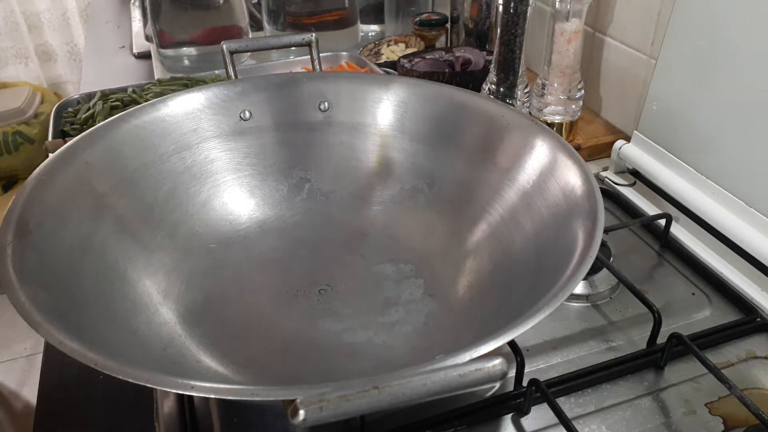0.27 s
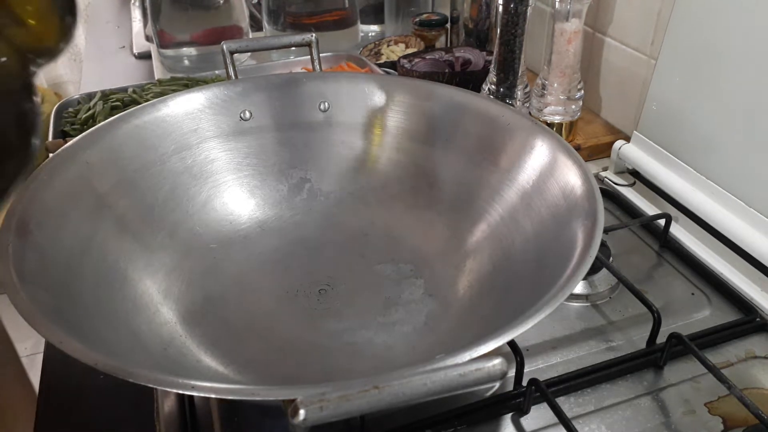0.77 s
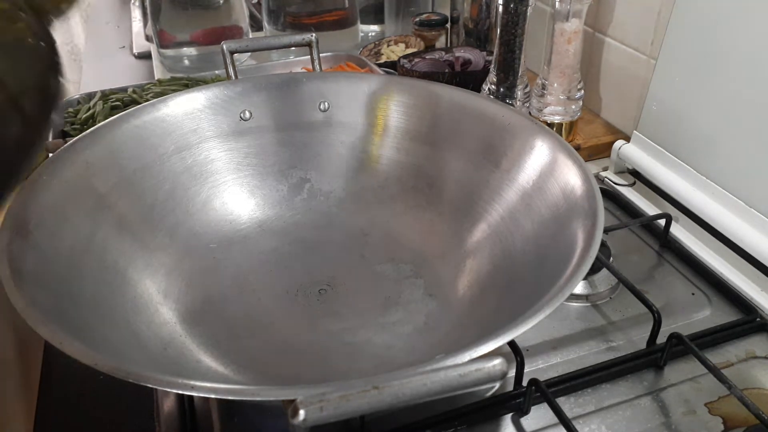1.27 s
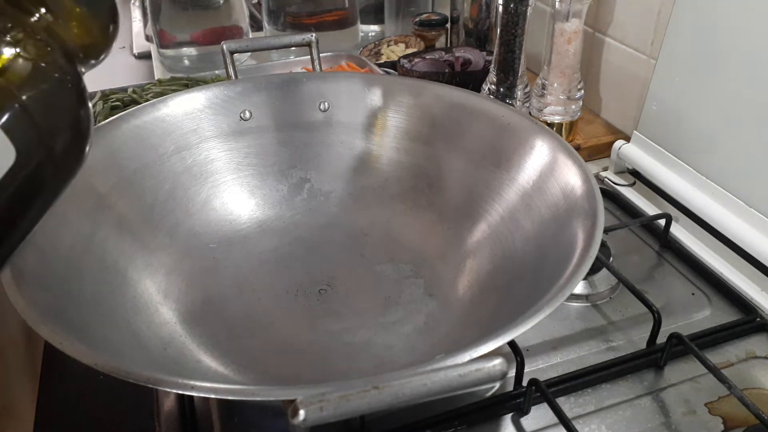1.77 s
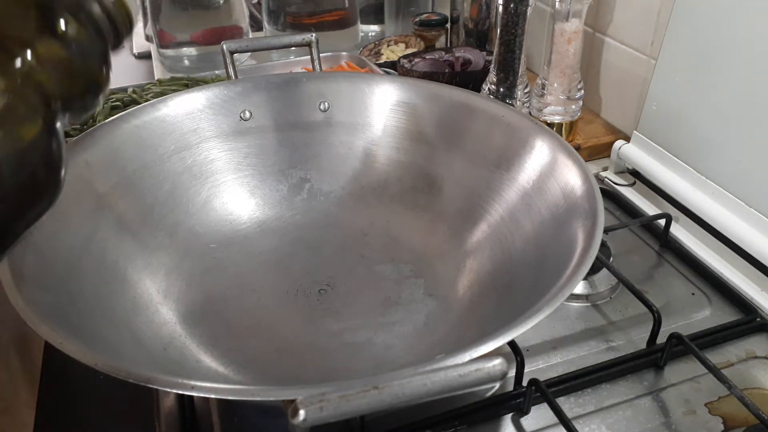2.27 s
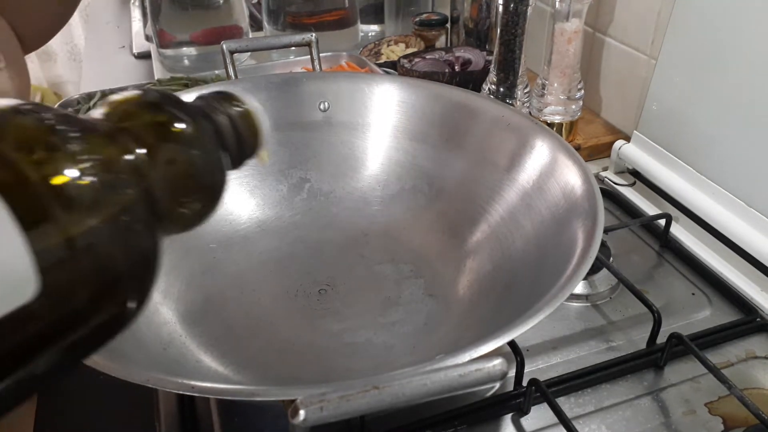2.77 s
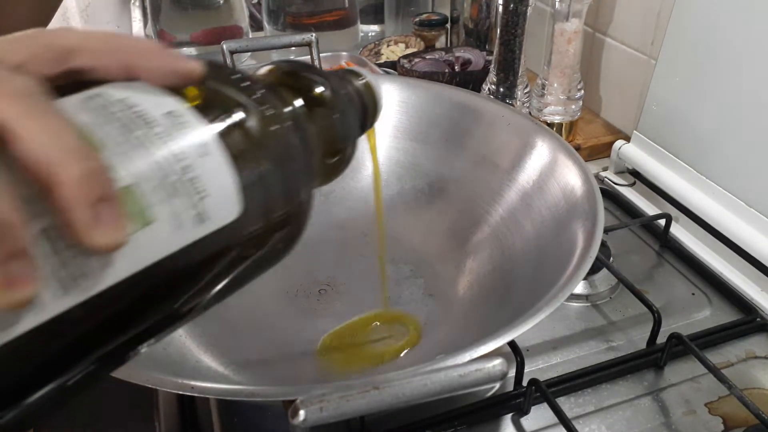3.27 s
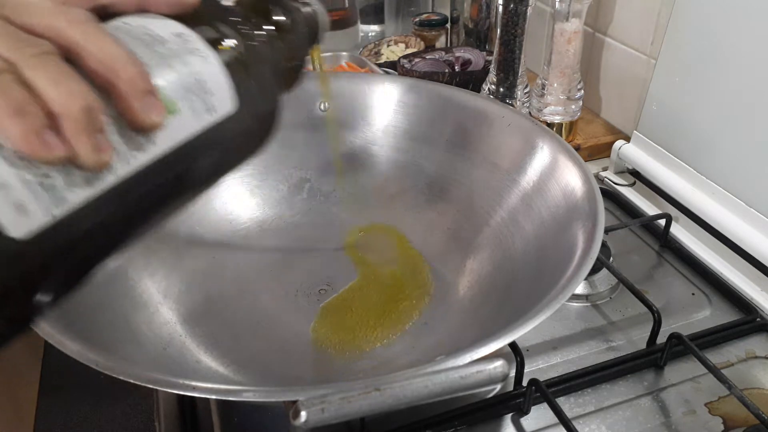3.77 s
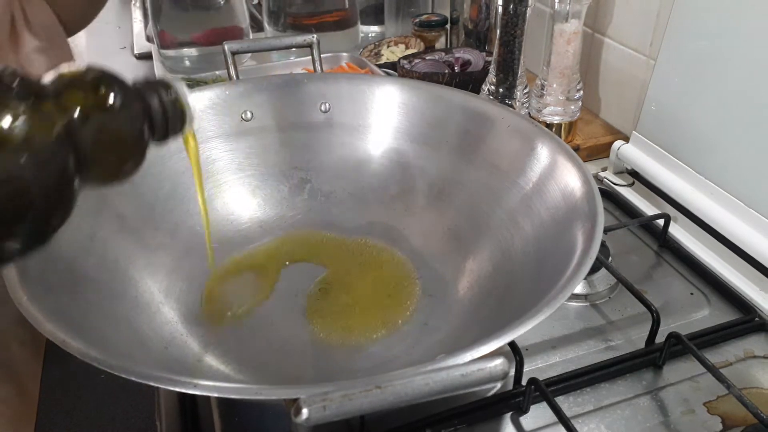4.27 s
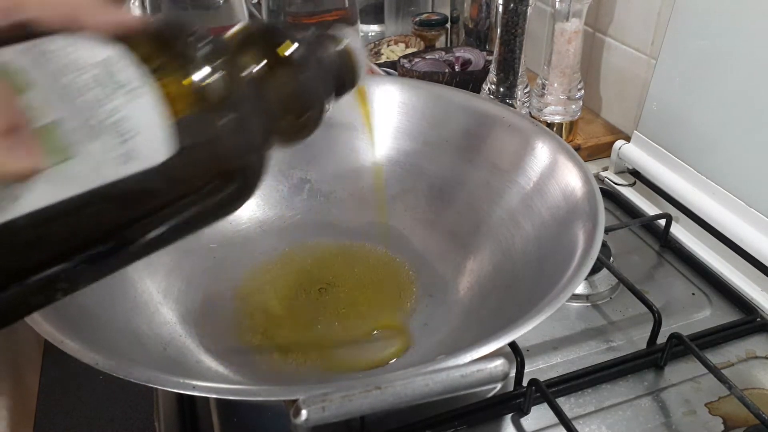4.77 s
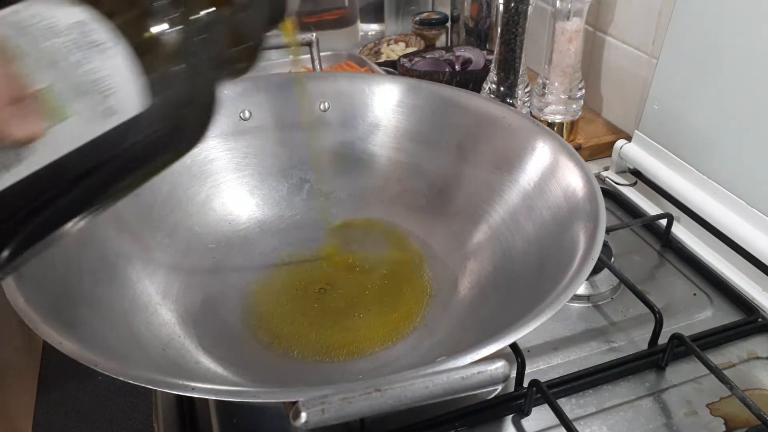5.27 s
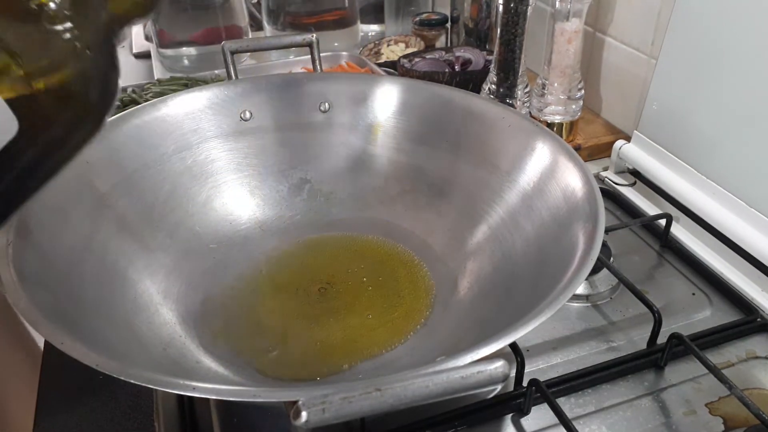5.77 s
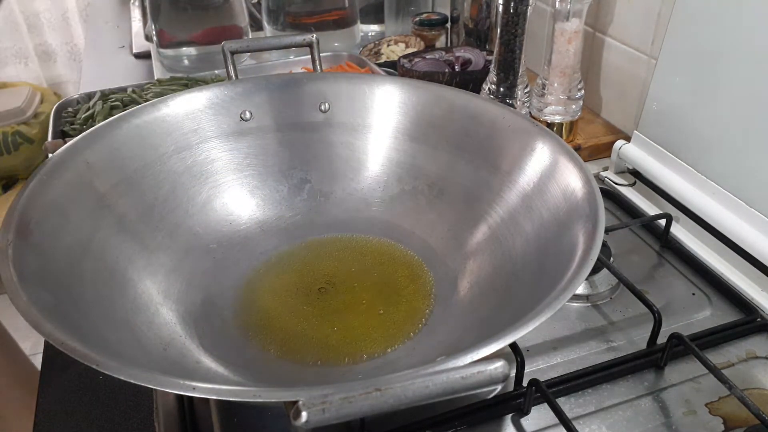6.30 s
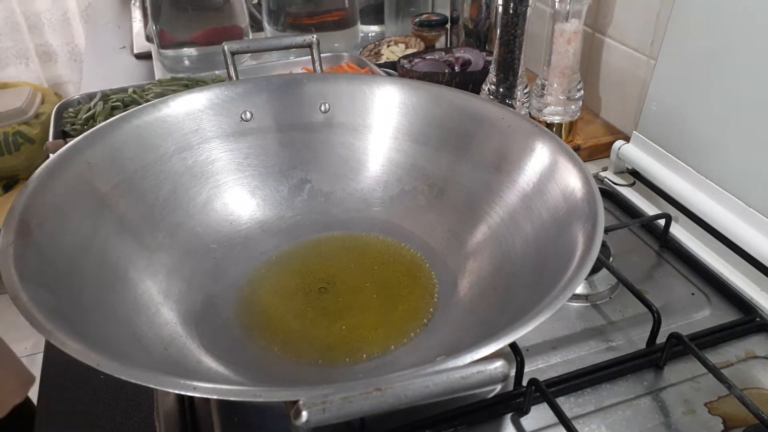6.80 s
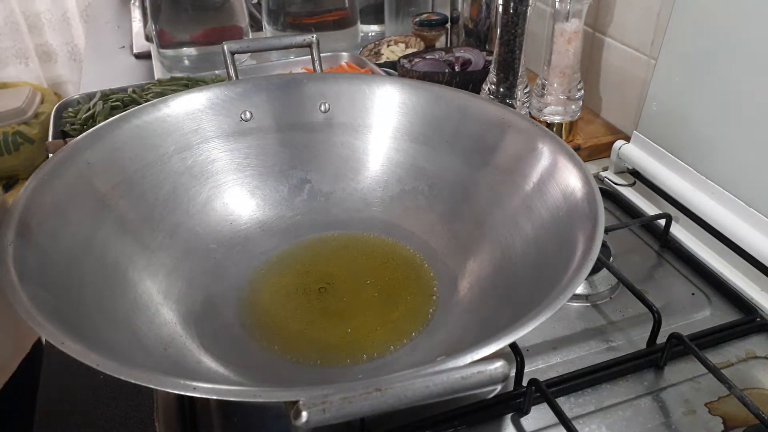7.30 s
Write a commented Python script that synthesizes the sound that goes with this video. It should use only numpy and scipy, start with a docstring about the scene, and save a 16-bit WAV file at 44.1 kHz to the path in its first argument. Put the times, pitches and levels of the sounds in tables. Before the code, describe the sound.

Over faint kitchen hiss, sharp cap snaps, small plastic ticks and low soft gulps of pouring oil, then cap taps and rough thread scrapes.

```python
"""Soft catches and scrapes of a turning cap come first, over a steady hiss with fixed resonances and a low rumble.
Then the cap of a plastic oil bottle snaps loose; the squeezed bottle ticks and air gulps softly in it
as it pours into a metal wok; at last the cap taps, scrapes and catches its way back on.
Clicks and scrapes are random slips filtered by plastic, gulps are gliding tones, and the background is
shaped noise; the bowl and the tiled kitchen echo the clicks, scrapes and crackle."""
import sys
import numpy as np
from scipy import signal
from scipy.io import wavfile
from scipy.ndimage import uniform_filter1d

SR = 44100
rng = np.random.default_rng(int(sys.argv[2]) if len(sys.argv) > 2 else 0)


def waveform_to_disk(signal):
    """Save audio, clipped to [-1, 1], as 16-bit WAV at the path in sys.argv[1]."""
    frames = np.transpose(np.atleast_2d(signal))
    scaled = np.clip(frames, -1, 1) * 32767
    samples = np.round(scaled).astype(np.int16)
    wavfile.write(sys.argv[1], SR, samples)


N = 332646  # length in samples


def gain_of(db):
    """Decibel law: amplitude factor of a level."""
    return 10 ** (np.asarray(db) / 20)


def evened(x):
    """Normalization: scale to unit effective (RMS) value."""
    return x / np.sqrt(np.mean(x ** 2) + 1e-20)


def read(points, hz):
    """Interpolation of a curve along the logarithm of frequency."""
    f, value = np.transpose(points)
    return np.interp(np.log(hz + 1), np.log(f + 1), value)


def gain_over_time(points):
    """Envelope principle: levels joined by straight lines in dB, as a gain for each sample."""
    s, db = np.transpose(points)
    return gain_of(np.interp(np.arange(N) / SR, s, db))


def add(mix, s, sound):
    """Superposition: add a sound to the mix from s seconds on."""
    part = mix[max(round(s * SR), 0):][:len(sound)]
    part += sound[:len(part)]


def coloured(x, gain):
    """Minimum-phase principle: a causal filter follows from its magnitude gain(hz) alone."""
    size = 2048
    log_gain = np.log(np.maximum(gain(abs(np.fft.fftfreq(size, 1 / SR))), 1e-5))
    spectrum = np.exp(np.conj(signal.hilbert(log_gain)))
    impulse_response = np.fft.ifft(spectrum).real[:size // 2]
    return signal.oaconvolve(x, impulse_response)


def modes(table, hz):
    """Resonance: summed power of peaks, each with its full width taken 6 dB down."""
    power = sum(gain_of(2 * db) / (1 + (2 * (hz - f) / width) ** 2) ** 2 for f, width, db in table)
    return np.sqrt(power)


def noise(gain, size, patchy_db):
    """Random-phase noise: Gaussian short-time spectra whose level drifts in patches of time and frequency."""
    frames, hz = N * 4 // size + 5, np.fft.rfftfreq(size, 1 / SR)
    real, imaginary, patches = rng.standard_normal((frames, len(hz), 3)).T
    patches = uniform_filter1d(patches, size=8, axis=0)
    patches = evened(uniform_filter1d(patches, size=12, axis=1))
    spectra = (real + 1j * imaginary) * gain(hz)[:, None] * gain_of(patchy_db * patches)
    return evened(signal.istft(spectra, nperseg=size, noverlap=size * 3 // 4)[1][:N])


# Broad colour of the hiss. Each row: frequency in Hz, relative density in dB per Hz.
HISS_COLOUR = [(120, -48), (200, -21), (659, -19), (763, -17.5), (1120, -10), (1400, -9.5), (1650, -20),
               (1870, -8), (2090, -17), (2250, -5), (2750, -18), (3070, -20), (4040, -13), (5200, -16),
               (6450, -15.5), (6950, -14.5), (7680, -16.5), (9230, -10.5), (16000, -15.5)]
# Resonances in the hiss. Each row: frequency in Hz, width in Hz, relative level in dB.
HISS_RESONANCES = [(1020, 40, -9), (1395, 85, -.6), (1850, 38, -6), (2235, 35, -5), (2575, 30, -8),
                   (2885, 30, -16), (3280, 30, -14), (3715, 38, -10), (4075, 70, -10), (4460, 90, -15),
                   (5950, 45, -14), (6315, 45, -11), (8620, 240, -15), (9150, 110, -7), (9560, 50, -12),
                   (9890, 80, -15), (10650, 90, -13), (11950, 90, -16)]
HISS_DB = -55  # effective level


def hiss():
    """Resonance in broadband noise: fixed narrow peaks stand out of a steady hiss."""
    def gain(hz):
        broad = gain_of(read(HISS_COLOUR, hz) - 7.5)
        return np.hypot(broad, modes(HISS_RESONANCES, hz)) * (hz > 200)
    return gain_of(HISS_DB) * noise(gain, size=2048, patchy_db=1.9)


# Colour of the rumble. Each row: frequency in Hz, relative density in dB per Hz.
RUMBLE_COLOUR = [(13, -66), (22, -29), (38, -12), (55, -36), (102, 5.5), (144, -5), (167, -5.5),
                 (275, -18.5), (325, -11.5), (400, -14.5), (520, -49), (880, -120)]
# Course of the rumble. Each row: time in seconds, level in dB.
RUMBLE_LEVEL = [(0, -69.5), (1.6, -71), (2.1, -64.5), (2.5, -68.5), (3.2, -67), (4.0, -68.5), (4.6, -65.5),
                (6.4, -68.5), (7.54, -68)]


def rumble():
    """Band-limited noise: a lumpy rumble below 400 Hz."""
    shape = noise(lambda hz: gain_of(read(RUMBLE_COLOUR, hz)) * (hz < 400), size=4096, patchy_db=3.5)
    return gain_over_time(RUMBLE_LEVEL) * shape


# Course of the deep hum. Each row: time in seconds, level in dB.
HUM_LEVEL = [(0, -76), (3.1, -78.5), (3.5, -77), (5.2, -74), (6.1, -75.5), (7.54, -90)]


def hum():
    """Narrow-band noise: one 71 Hz resonance, 10.6 Hz wide, sounds as a wavering hum."""
    shape = noise(lambda hz: modes([(71.0, 10.6, 0)], hz), size=4096, patchy_db=2.9)
    return gain_over_time(HUM_LEVEL) * shape


# Two low resonances. Each row: frequency in Hz, width in Hz, relative level in dB.
DRIFTING_MODES = [(766, 64, 0), (549, 34, 0)]
# Their course. Each row: time in seconds, level of the upper in dB, level of the lower in dB.
DRIFTING_LEVELS = [(0, -82, -79), (.75, -65, -88.5), (1.7, -76, -86), (2.46, -66, -82), (3.1, -73.5, -82),
                   (4.3, -73.5, -82), (5.5, -77, -86.5), (7.3, -71.5, -72.5), (7.54, -75, -72)]


def drifting_resonances():
    """Modulated narrow-band noise: two low resonances come and go independently."""
    s, *levels = np.transpose(DRIFTING_LEVELS)
    out = np.zeros(N)
    for mode, db in zip(DRIFTING_MODES, levels):
        shape = noise(lambda hz: modes([mode], hz), size=2048, patchy_db=5.0)
        out += gain_over_time(np.transpose([s, db])) * shape
    return out


# Decay of the room. Each row: frequency in Hz, time to fall by 60 dB in seconds.
KITCHEN_DECAY = [(500, 0.48), (2500, 0.37), (7000, .25), (15000, 0.15)]


def kitchen():
    """Reverberation: a tail of sparse random pulses dies faster in the treble."""
    pulses = np.zeros(SR // 2)
    at = np.arange(200, len(pulses) - 10, 10)
    pulses[at + rng.integers(0, 10, len(at))] = rng.choice([-1., 1.], len(at))
    hz, t, spectra = signal.stft(pulses, SR, nperseg=128)
    decay = gain_of(-60 * t / read(KITCHEN_DECAY, hz)[:, None])
    tail = signal.istft(spectra * decay, SR, nperseg=128)[1]
    return gain_of(-4.0) * tail / np.linalg.norm(tail)


# Quick echoes off the metal bowl. Each row: delay in seconds, level in dB over a source above the bowl.
BOWL_ECHOES = [(.0017, -10.5), (.0026, -48.5), (.0036, 3), (.0052, -33), (.0063, -11), (.009, -34)]


def bowl(less_db=0):
    """Early reflection: the direct sound and delayed copies off the metal bowl."""
    out = np.zeros(600)
    out[0] = 1
    for s, db in BOWL_ECHOES:
        out[round(s * SR)] += gain_of(db + less_db)
    return out


# Air gulps and low bumps in the bottle. Each row: start in seconds, level in dB before onset and decay,
# pitch in Hz mid-glide, final pitch as a factor of that (below 1 falls), time to fall by 60 dB in seconds.
GULP_EVENTS = [(1.896, -45, 133, .74, 0.12), (1.899, -59, 310, .58, 0.24), (2.124, -50.5, 257, 1.02, 0.38),
               (3.275, -50.5, 109, 0.97, 0.35), (4.463, -47.5, 116, 1.2, 0.4),
               (5.45, -64.5, 189, 1.2, 0.52), (6.333, -51, 144, 0.74, 0.36),
               (6.334, -61.5, 253, 1.04, 0.41)]
GLIDE_S = 0.0233


def gulps():
    """Cavity resonance: a soft low tone glides as the air pocket changes size."""
    t = np.arange(SR // 2) / SR
    out = np.zeros(N)
    for s, level_db, hz, factor, t60 in GULP_EVENTS:
        pitch = hz * factor ** np.tanh(t / GLIDE_S - 1)
        envelope = gain_of(level_db - 60 * t / t60) * (1 - np.exp(-t / 0.0085))
        add(out, s, envelope * np.sin(2 * np.pi * np.cumsum(pitch) / SR))
    return out


# Squeezes of the bottle. Each row: time in seconds, peak of the effective level in dB.
SQUEEZE_EVENTS = [(3.442, -72), (3.535, -60.5), (3.752, -57.5), (3.89, -68)]
SWELL_DB_PER_S, FADE_DB_PER_S = 252, 150


def crackle():
    """Impulsive noise: uneven tiny clicks of the plastic wall, mostly treble, strongest at each squeeze."""
    t = np.arange(N) / SR
    level = np.zeros(N)
    for s, db in SQUEEZE_EVENTS:
        level += gain_of(db - np.maximum(SWELL_DB_PER_S * (s - t), FADE_DB_PER_S * (t - s)))
    clicks = rng.standard_normal(N) * gain_of(2.8 * np.minimum(rng.exponential(1, N), 5))
    return level * evened(coloured(clicks, lambda hz: modes([(12300, 9500, 0)], hz))[:N])


def bump(hz, centre, octaves):
    """Resonance as a Gaussian hill over pitch."""
    return np.exp(-.5 * (np.log2((hz + 1) / centre) / max(octaves, .04)) ** 2)


def click(body, burst_s, fixed_hz, first_slip, peak_db, main_hz, octaves, broad_db, fixed_db, soft):
    """Stick-slip excitation: a dying burst of small slips rings round two pitches; soft clicks swell first."""
    t = np.arange(1500) / SR
    sign, size = rng.standard_normal(len(t)), rng.exponential(1, len(t))
    u = t / burst_s
    slips = 0.45 * sign * gain_of(1.8 * np.minimum(size, 5)) * np.exp(-u) * (u if soft else 1)
    slips[0] = first_slip
    # dividing by the smoothed spectrum makes the burst flat in broad colour
    lumps = np.sqrt(uniform_filter1d(abs(np.fft.fft(slips, 2048)) ** 2, size=40, mode="wrap"))

    def gain(hz):
        main_ring = bump(hz, main_hz, octaves)
        # the fixed ring is wider, in octaves, the lower it lies
        fixed_ring = gain_of(fixed_db) * bump(hz, fixed_hz, 0.093 + 250 / fixed_hz)
        return (main_ring + fixed_ring + gain_of(broad_db + read(body, hz))) / lumps
    sound = coloured(slips, gain)
    return gain_of(peak_db) * sound / abs(signal.oaconvolve(sound, bowl())).max()


def clicks_of(table, body, burst_s, fixed_hz, first_slip, soft=False):
    """Superposition of clicks that share one colour, burst length, fixed ring and first slip."""
    out = np.zeros(N)
    for s, *shape in table:
        add(out, s, click(body, burst_s, fixed_hz, first_slip, *shape, soft=soft))
    return out


# Broad colour of ticks and snaps. Each row: frequency in Hz, relative density in dB per Hz.
SHARP_COLOUR = [(350, -59), (600, -34.5), (737, -15.5), (1100, -22.5), (1430, -18), (2040, -14),
                (4160, 1.5), (4780, -6), (6200, -2), (8620, 1), (16000, -3.5)]
# Ticks of the bottle wall in the hand. Each row: start in seconds, peak in dB with full bowl echoes,
# main ring in Hz, its width in octaves, broad share in dB, fixed ring in dB relative to the main one.
TICK_EVENTS = [(3.4342, -30, 14000, 0.5, -18, -25), (3.487, -40, 10400, .3, -10, -25),
               (3.5063, -37, 12500, 0.41, -11, -20), (3.5314, -29.5, 11400, 0.18, -23, -30),
               (3.559, -38, 1990, 0.14, -13, -8), (3.706, -40.5, 7660, .13, -15, -20),
               (3.7294, -38, 15000, .28, -22, -22), (3.7535, -30, 15300, 0.17, -25, -28),
               (3.8, -36, 5450, 0.18, -3, -20), (3.8813, -33.5, 14300, .25, -1, -15),
               (3.924, -38, 12500, .4, -8, -20), (4.2294, -41, 12000, .36, -5, -20),
               (4.3148, -37.5, 9600, 0.078, -9, -6), (4.349, -36, 15000, .25, -3, -25),
               (4.512, -29, 12500, 0.23, -9, -3), (4.5965, -37, 9900, 0.18, -20, 1.5),
               (4.6362, -23.5, 10900, 0.27, -27, -21), (4.7396, -36, 12400, .18, -18, -23),
               (5.001, -40, 3700, 0.13, -27, -15)]


def ticks():
    """Impulsive excitation: the bottle wall gives way with one sharp slip and rings."""
    return clicks_of(TICK_EVENTS, SHARP_COLOUR, burst_s=.0031, fixed_hz=5200, first_slip=3.2)


# Duller broad colour of taps and catches. Each row: frequency in Hz, relative density in dB per Hz.
DULL_COLOUR = [(290, -27), (500, -19.5), (1340, -4), (3060, -6.5), (3590, 2), (4660, -5.5), (9090, -1.5),
               (11100, -6), (16000, -7)]
# Taps of the cap on the neck as it goes back on. Each row: start in seconds, peak in dB if it had full
# bowl echoes, main ring in Hz, its width in octaves, broad share in dB, fixed ring in dB relative to main.
TAP_EVENTS = [(5.987, -22.5, 3260, 0.56, -9, -16), (6.114, -28.5, 2910, 0.48, -23, -6.5),
              (6.1824, -42.5, 3660, 0.14, -13, -25), (6.32, -25.5, 6000, 0.11, -1, -21),
              (6.3365, -27.5, 6500, 0.17, 16, .5), (6.351, -32, 4940, .46, 4, -2),
              (6.391, -29.5, 4060, .2, 0, -22), (6.453, -40, 5800, .2, -1, -27),
              (7.048, -24.5, 3900, 0.079, -7, -41), (7.084, -31, 3870, 0.33, 3, -22)]


def taps():
    """Soft impact: contact of cap and neck swells briefly before it dies."""
    return clicks_of(TAP_EVENTS, DULL_COLOUR, burst_s=.0014, fixed_hz=1250, first_slip=.3, soft=True)


# Catches of the cap on its thread. Each row: start in seconds, peak in dB if it had full bowl echoes,
# main ring in Hz, its width in octaves, broad share in dB, fixed ring in dB relative to main.
CATCH_EVENTS = [(.001, -22, 5300, 0.69, -5, 3), (0.238, -35, 5230, 0.099, -10, -2),
                (.2725, -27.5, 4200, .1, -7, 14), (0.2926, -33, 4200, .1, -5, 21),
                (0.3162, -29, 8850, .22, 14, -4), (6.522, -29, 5650, .07, -7, -20),
                (6.548, -28.5, 5590, 0.072, 8, -15), (6.7784, -23.5, 6300, 0.32, -21, -37),
                (6.7813, -16, 3750, .1, 36, -16), (6.827, -24, 9810, 0.099, -6, -4),
                (6.8507, -19.5, 9100, 0.12, -8, -5), (6.8716, -30, 3750, 0.12, -8, 6),
                (7.3105, -39, 4240, 0.18, -6, -25)]


def catches():
    """Stick-slip friction: the cap catches on its thread in short soft bursts."""
    return clicks_of(CATCH_EVENTS, DULL_COLOUR, burst_s=.0035, fixed_hz=2600, first_slip=0, soft=True)


# Colour of the rub. Each row: frequency in Hz, relative density in dB per Hz.
THREAD_COLOUR = [(290, -52.5), (500, -20.5), (1060, -12), (1250, -21), (1400, -5), (1820, -9.5), (2460, -2),
                 (3250, -6), (9770, -18), (16000, -32.5)]
# The cap turns on its thread or fingers slide on the bottle. Each row: strongest moment in seconds,
# rise in seconds, fall in seconds, effective level at the peak in dB, brightness in dB per octave.
TURN_EVENTS = [(.005, .005, .07, -43, 4), (.31, .24, .3, -49, 4.5), (1.35, .16, .05, -51.5, 3),
               (2.09, 0.056, 0.037, -57, -2), (5.207, 0.14, 0.071, -53.5, 11.5),
               (6.532, 0.073, 0.065, -47, 3), (6.854, 0.083, 0.094, -36, 4.5), (7.091, 0.043, .2, -53.5, 5),
               (7.314, .09, 0.088, -57, 5)]
TURN_FADE_DB, TURN_ROUNDNESS = -25.5, 1.3  # level at both ends under the peak; 1 = pointed peak, 2 = round


def turns():
    """Sliding friction: dense uneven slips through the plastic swell and fade in an arch."""
    out = np.zeros(N)
    for peak_s, rise_s, fall_s, peak_db, tilt_db in TURN_EVENTS:
        t = np.arange(-rise_s, fall_s, 1 / SR)
        away = np.where(t < 0, -t / rise_s, t / fall_s)  # 0 at the peak, 1 at either end
        level_db = peak_db + TURN_FADE_DB * away ** TURN_ROUNDNESS
        sizes = np.minimum(rng.exponential(1, len(t)), 5)
        slips = rng.standard_normal(len(t)) * gain_of(4.06 * sizes)

        def gain(hz):
            return gain_of(read(THREAD_COLOUR, hz) + tilt_db * np.log2((hz + 300) / 4000))
        rub = coloured(slips, gain)[:len(t)]
        add(out, peak_s - rise_s, gain_of(level_db) * evened(rub))
    return out


# Snaps of the cap breaking loose. Each row: start in seconds, peak in dB with full bowl echoes,
# main ring in Hz, its width in octaves, broad share in dB, fixed ring in dB relative to the main one.
SNAP_EVENTS = [(1.3862, -13, 9800, .23, 6, -8), (1.804, -13.5, 11000, .42, 12, 8),
               (1.859, -8.5, 8260, .3, 5, -8), (1.8725, -8, 7800, .3, 0, -7),
               (1.902, -6, 7500, .35, 3.5, -3), (2.1124, -4.5, 9200, .3, -5, -30)]


def snaps():
    """Sudden release: the cap breaks loose with one sharp slip and a dying burst that rings."""
    return clicks_of(SNAP_EVENTS, SHARP_COLOUR, burst_s=.0031, fixed_hz=4100, first_slip=2.2)


DRIER_DB = -2.5  # the cap close to the microphone stirs the room less
AWAY_DB = -12.5  # echoes off the bowl are weaker for the cap handled beside it


def scene():
    """Superposition: hand sounds pass the bowl and the room; gulps and background come direct."""
    background = hiss() + rumble() + hum() + drifting_resonances()
    over_bowl = crackle() + ticks() + snaps()
    beside_bowl = taps() + catches() + turns()
    near = signal.oaconvolve(over_bowl, bowl())[:N] + signal.oaconvolve(beside_bowl, bowl(AWAY_DB))[:N]
    to_room = over_bowl + gain_of(DRIER_DB) * beside_bowl
    reverberant = signal.fftconvolve(to_room, kitchen())[:N]
    mid = near + reverberant + gulps() + background
    return np.array([mid, mid])


# Faint noise of opposite sign left and right. Each row: frequency in Hz, relative density in dB per Hz.
SIDE_COLOUR = [(18, -31), (30, -4), (970, -7), (1260, -27), (2690, -24), (3320, -20), (6050, -19),
               (10500, -26), (15500, -0.5)]
SIDE_DB, EDGE_HZ = -78, 15780  # effective level before the band limit; upper edge of the band


def record(dry):
    """Stereo difference and band limiting: faint opposite noise parts the channels, then a low-pass."""
    faint = noise(lambda hz: gain_of(read(SIDE_COLOUR, hz)), size=1024, patchy_db=3.0)
    pair = dry + gain_of(SIDE_DB) * faint * np.array([[1], [-1]])
    low_pass = signal.firwin(501, EDGE_HZ, window=("kaiser", 9), fs=SR)
    return signal.oaconvolve(pair, low_pass[None], "same", axes=1)


dry = scene()
out = record(dry)
waveform_to_disk(out)
```